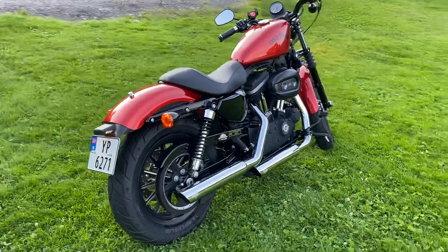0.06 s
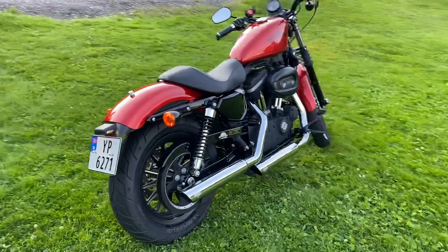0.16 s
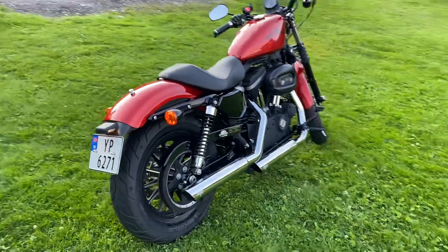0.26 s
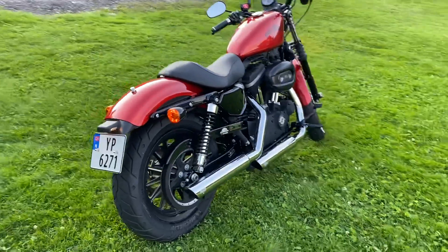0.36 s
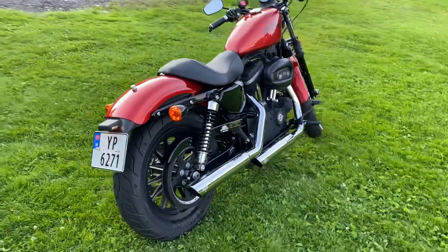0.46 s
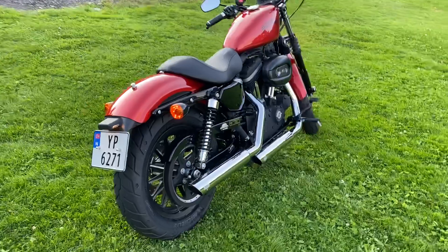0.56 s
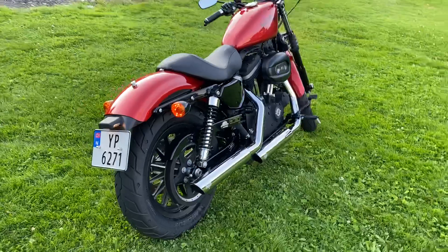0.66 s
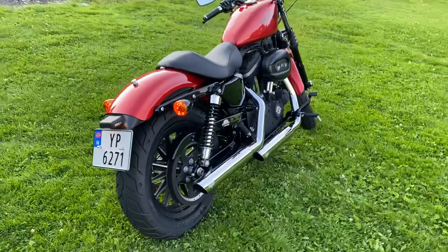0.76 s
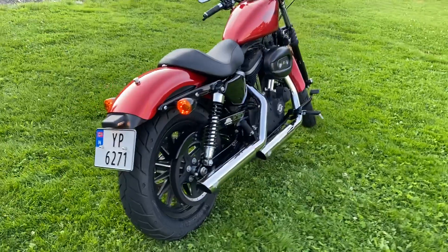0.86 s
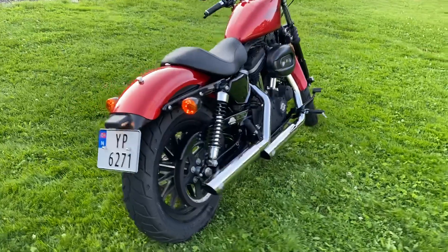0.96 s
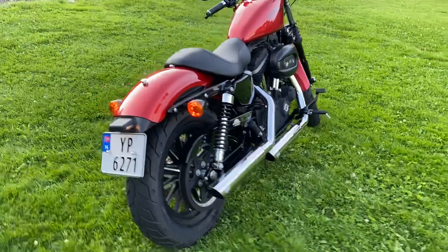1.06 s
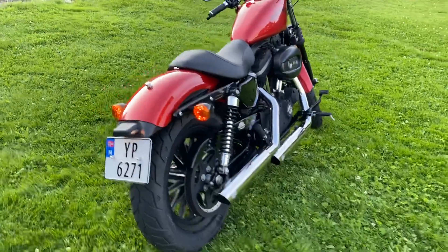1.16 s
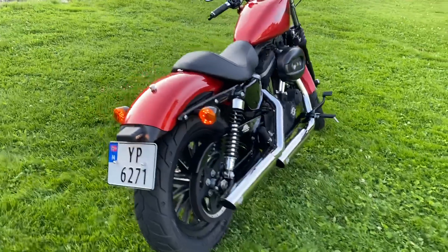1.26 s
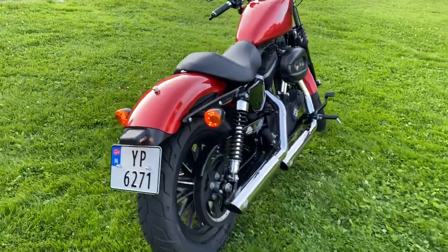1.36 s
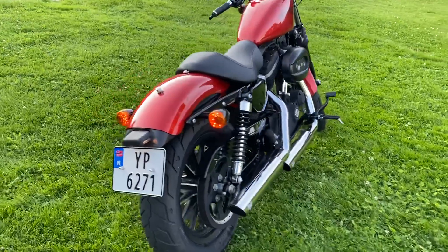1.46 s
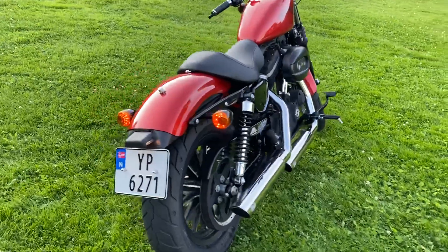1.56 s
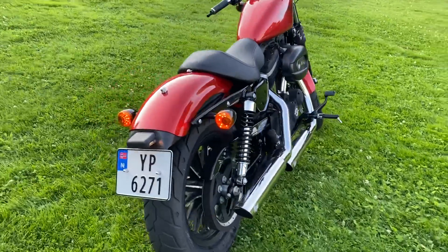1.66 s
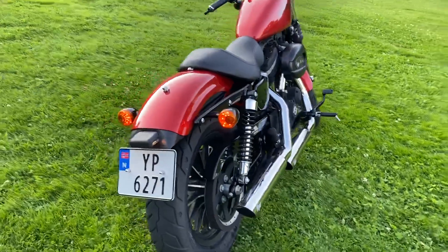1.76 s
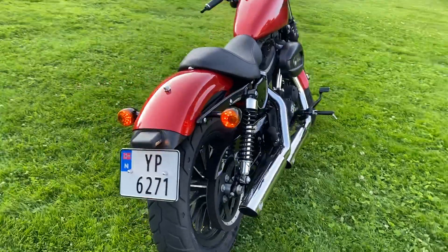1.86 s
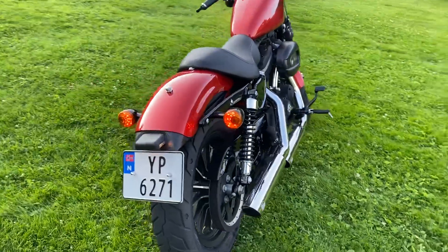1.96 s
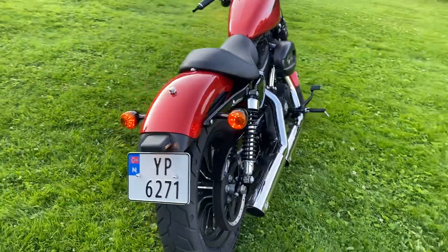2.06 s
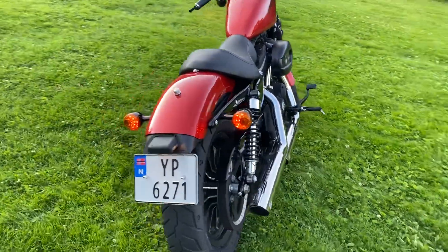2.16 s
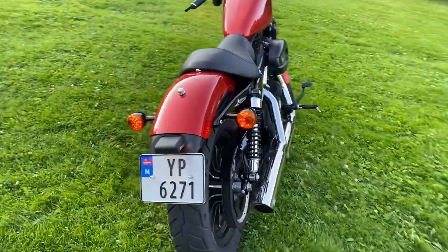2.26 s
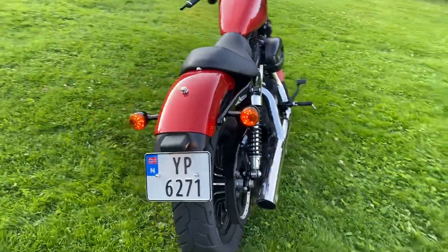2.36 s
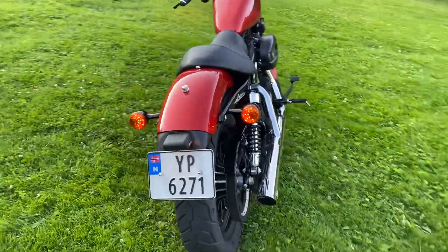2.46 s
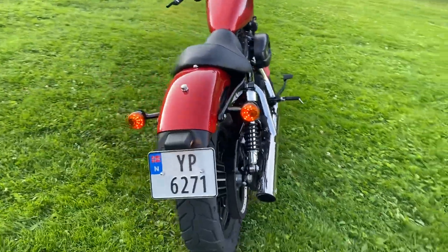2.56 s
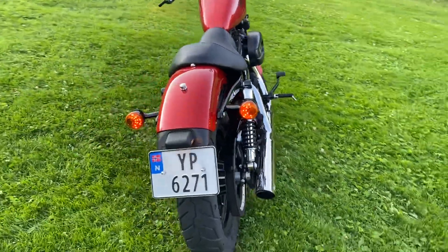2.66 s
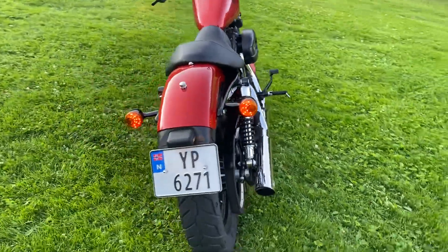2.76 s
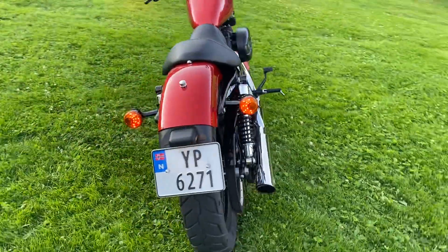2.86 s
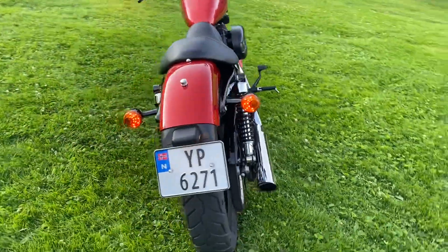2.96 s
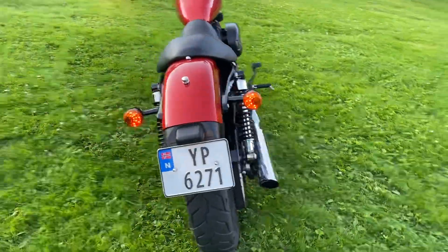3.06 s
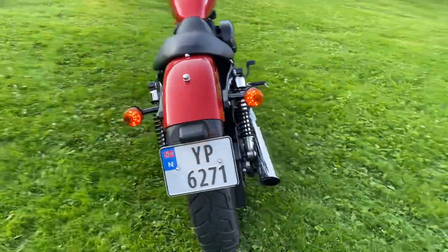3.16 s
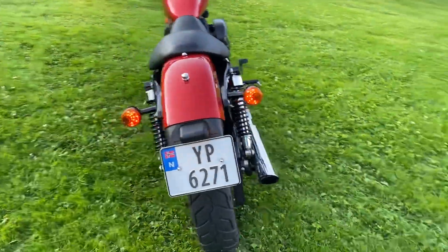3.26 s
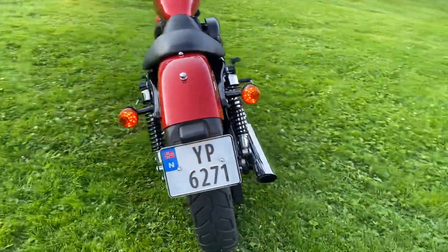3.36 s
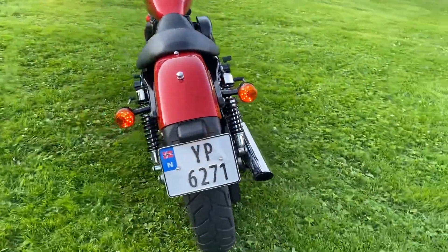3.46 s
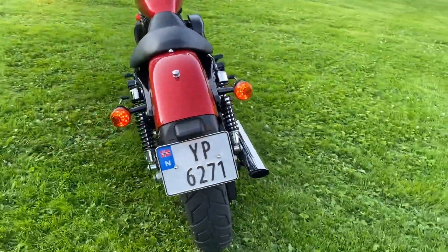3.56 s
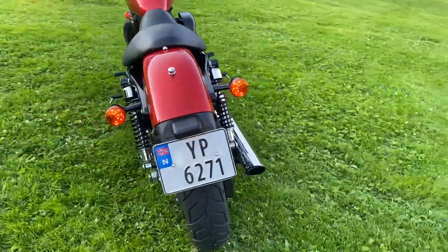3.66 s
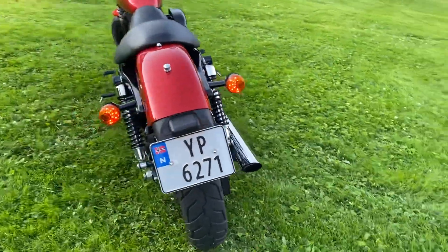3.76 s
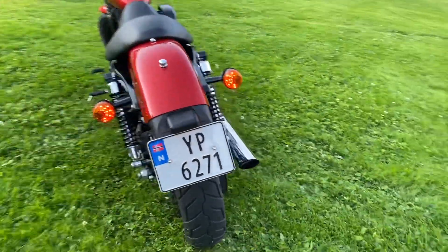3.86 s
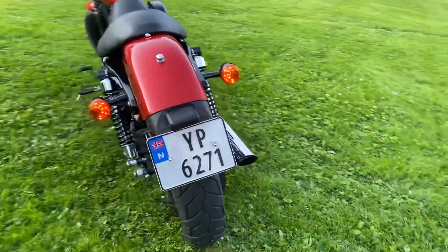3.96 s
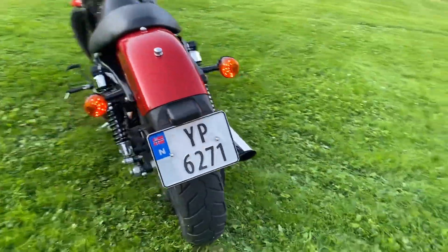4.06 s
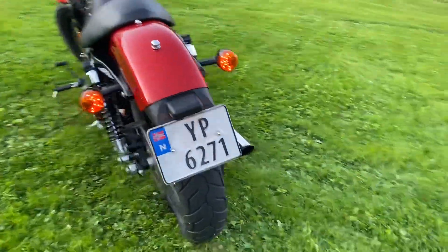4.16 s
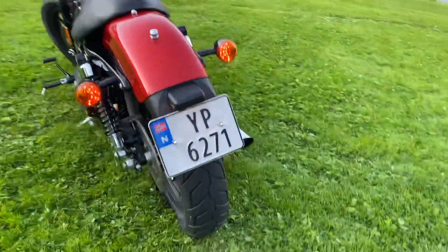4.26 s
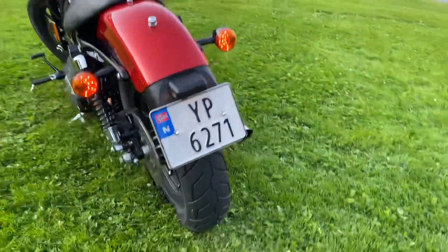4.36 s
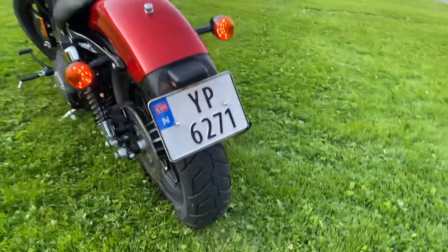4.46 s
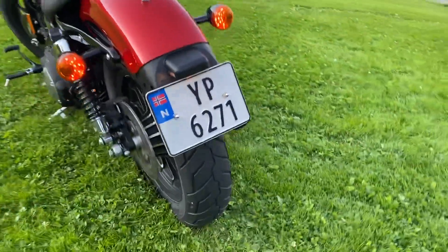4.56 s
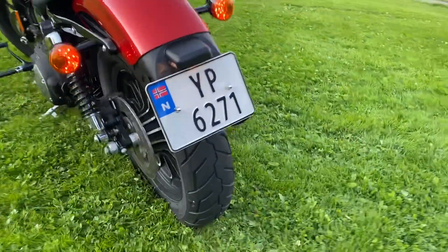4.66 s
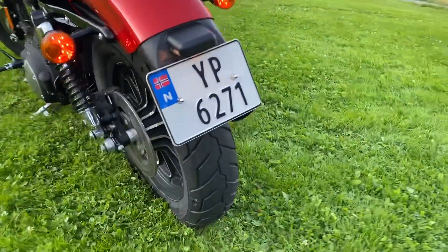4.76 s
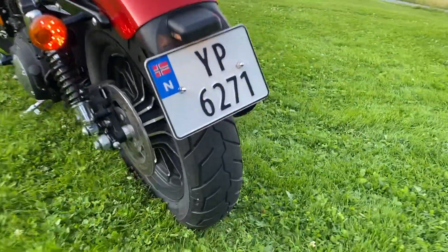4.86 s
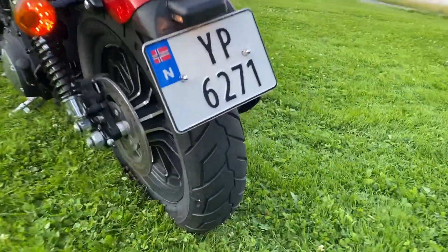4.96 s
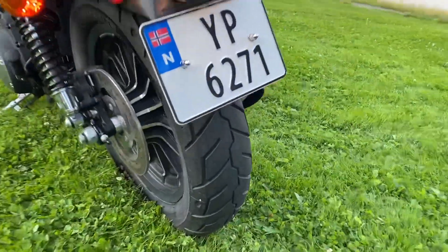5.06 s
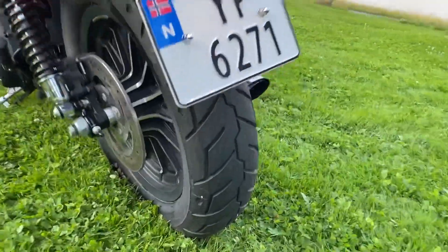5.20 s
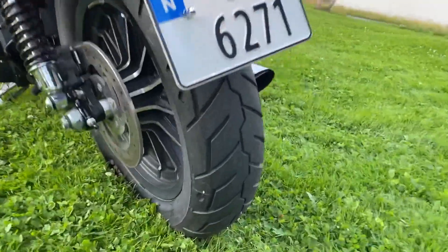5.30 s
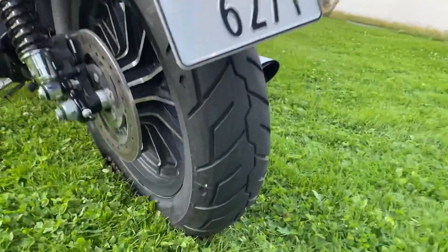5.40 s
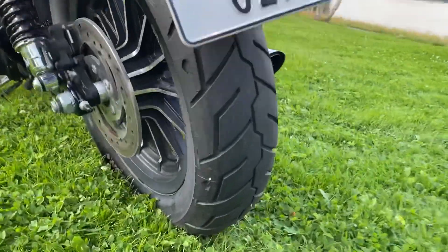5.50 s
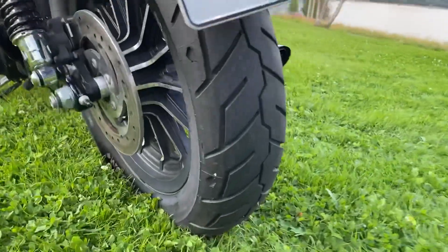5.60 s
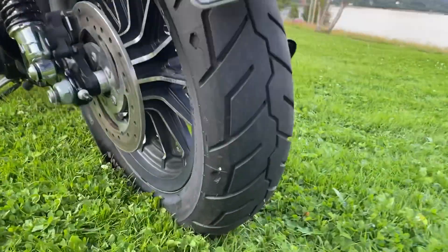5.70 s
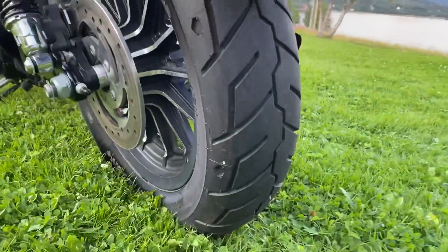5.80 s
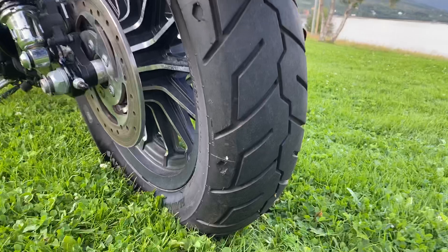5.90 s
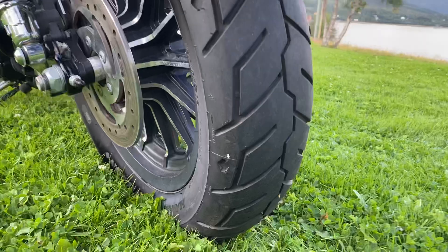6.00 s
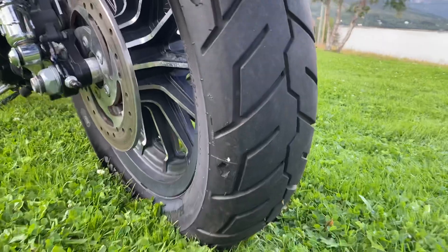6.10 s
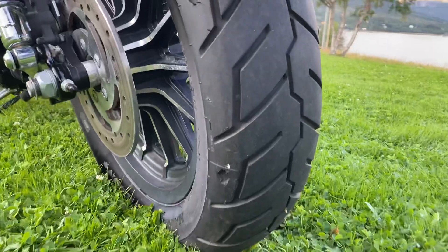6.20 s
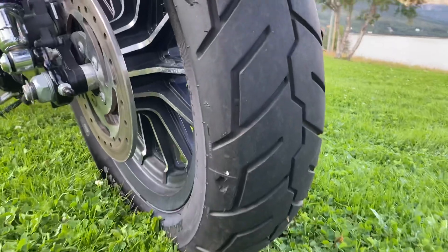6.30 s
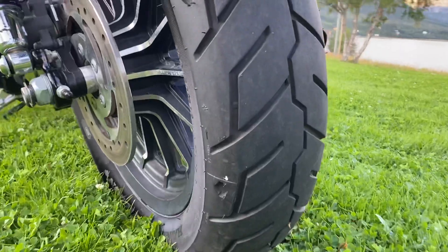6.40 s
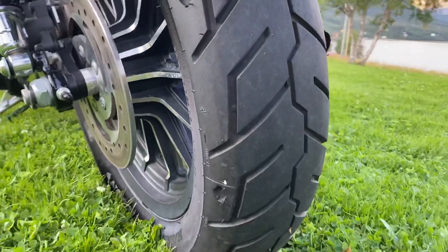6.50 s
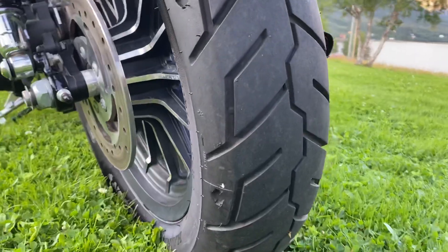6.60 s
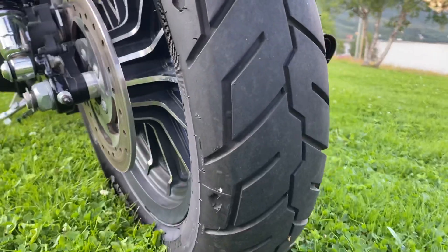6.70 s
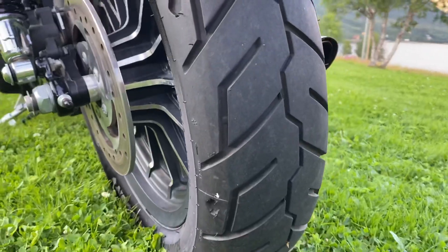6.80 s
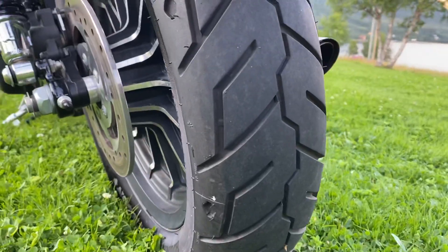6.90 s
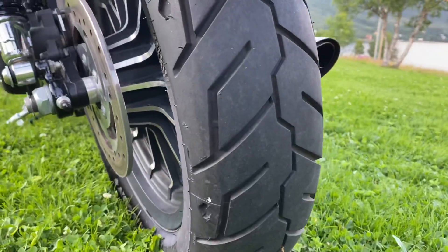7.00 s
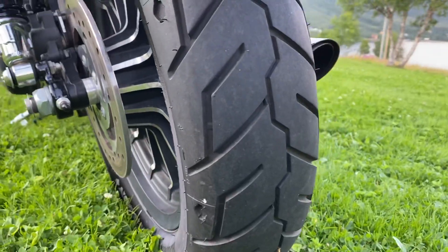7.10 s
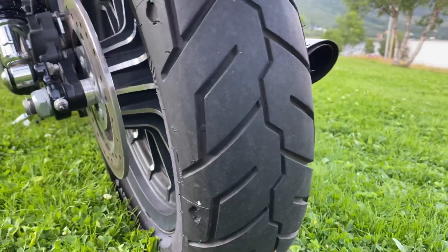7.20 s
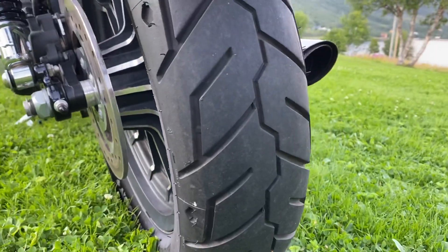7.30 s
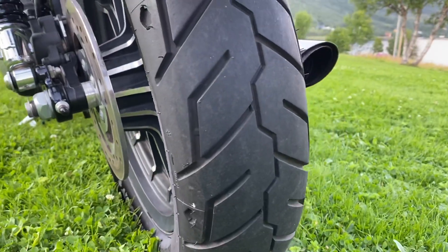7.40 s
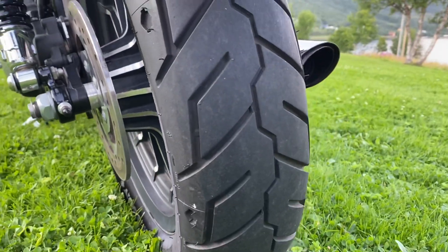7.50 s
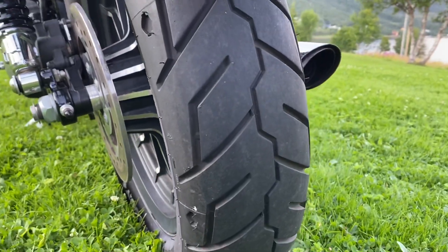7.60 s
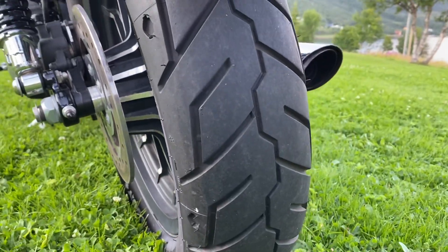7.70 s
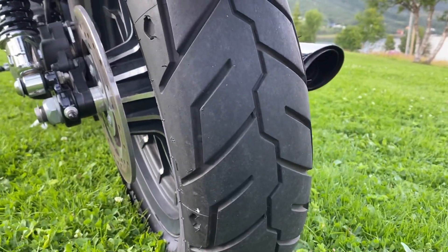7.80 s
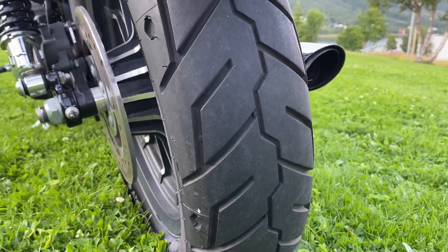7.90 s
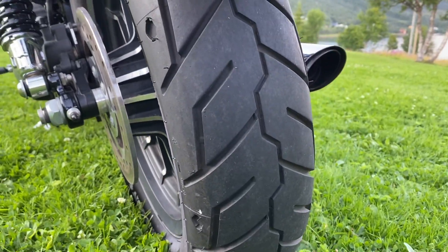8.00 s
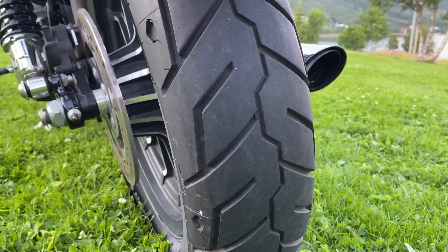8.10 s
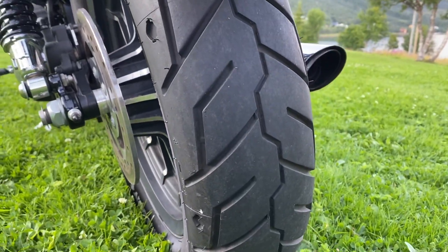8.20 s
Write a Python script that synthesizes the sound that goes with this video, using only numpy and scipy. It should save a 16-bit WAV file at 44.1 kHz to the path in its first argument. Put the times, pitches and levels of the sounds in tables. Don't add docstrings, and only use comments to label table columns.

```python
import sys
import numpy as np
from scipy import signal
from scipy.fft import rfft, irfft
from scipy.io import wavfile

SR = 44100
rng = np.random.default_rng(int(sys.argv[2]) if len(sys.argv) > 2 else 0)


def rack_gain(trim_db):
    fader = np.asarray(trim_db, float)
    return 10 ** (fader / 20)


def unload_audio(sound):
    columns = np.transpose(np.atleast_2d(sound))
    steps = np.round(np.clip(columns, -1, 1) * 32767)
    wavfile.write(sys.argv[1], SR, steps.astype(np.int16))


N = 363825
HZ = np.maximum(np.arange(N // 2 + 1) * SR / N, 1)

# time_s, cycles_done [count]; the front exhausts at each whole cycle
CRANK_TURNS = [(.0118, 0), (.2076, 2), (.4914, 5), (.689, 7), (1.4661, 15), (2.1335, 22), (2.9297, 30),
               (3.4194, 35), (3.9948, 41), (4.3906, 45), (5.0777, 52), (5.1823, 53), (5.9847, 61),
               (6.3638, 65), (6.4654, 66), (6.8488, 70), (7.7429, 79), (8.2495, 84)]
# time_s, crouch [0-1], engine_view_db, front_pipe_aim_db, rear_pipe_aim_db
LISTENER_WALK = [(0, 0.17, 1, 0.5, -4.5), (.75, 0, 1, -0.5, -3.5), (1.3, 0.15, 0.5, 1.5, -3),
                 (1.55, 0.13, 1.5, 0, 2), (2.1, 0.14, 1.5, 1, 3.5), (2.6, 0.14, -2, 0.5, 2),
                 (3.3, 0.1, -4, -1.5, -2.5), (3.45, 0.16, -4, -7, 0.5), (4.2, 0.24, -5.5, -10, 0),
                 (4.9, .4, -2.5, -12.5, -1.5), (5.5, 0.9, -1.5, -5, 4.5), (6.0, 1, 0, -4.5, 0),
                 (6.55, 0.77, -2.5, -5, 3.5), (7.1, 1, -2.5, -3, 3.5), (7.9, 0.85, -2, -1, 4.5),
                 (8.1, 0.8, -8, 0, 4.5), (8.25, 0.55, -2, -12, -5)]
# time_s, charge_db
FRONT_MIXTURE = [(.01, 1), (.11, 2.5), (.21, 0), (.3, -2), (.4, 3), (.59, -1), (.88, 0), (1.27, -2),
                 (1.37, -3.5), (1.85, -1), (1.94, 2), (2.23, -2.5), (2.43, 2), (2.83, -1.5), (2.93, 2.5),
                 (3.13, -2), (3.71, 0.5), (4.39, -1.5), (4.58, 3), (5.08, 4.5), (5.58, 3), (5.98, 1.5),
                 (6.27, -2.5), (6.56, -2), (7.05, 1), (7.54, 0.5), (7.64, -1.5), (7.84, -2), (7.94, 0.5),
                 (8.15, -1)]
# time_s, charge_db
REAR_MIXTURE = [(.53, 1.5), (4.63, 2), (.63, -10.5), (.73, -3), (1.02, -6.5), (1.22, 14), (1.51, 2),
                (1.98, 2), (2.28, 1), (2.38, -7), (2.87, -4), (2.97, -12), (3.17, 11.5), (3.26, 0),
                (3.36, -4), (4.04, 0), (4.73, -21), (4.83, -5), (5.23, 1), (5.53, -0.5), (5.83, 1.5),
                (5.93, -10), (6.21, 3), (6.41, -3), (6.51, -5.5), (6.89, 1.5), (7.69, 0), (7.79, -9.5),
                (7.89, -2), (8.19, -10)]
# level_db, aim_slope [dB/dB], crouch_gain_db
FRONT_STROKE_LAW = [(-0.27, 0, 1.76), (-17.5, 0.02, 2.5), (-20, 2, 3), (-21.5, 0.74, -1.5)]
REAR_STROKE_LAW = [(-0.2, 0, 2), (-15, 0.66, 0.5), (-15, 1, 0), (-16, 0.29, 3.5)]
MISFIRE_LAW = [(-2, 0.29, 4), (-35, 0.99, 0), (-39, 1, 3), (-37.5, 0.86, 5.5)]
# pitch_hz, level_db [per Hz]
RUMBLE_COLOUR = [(25, -20), (60, 14.5), (200, 15), (420, -3.5), (700, -0.5), (900, -10), (1200, -7.5),
                 (1400, -20), (1550, -9), (1800, -57), (2500, -51)]
# pitch_hz, level_db [per Hz]
HISS_COLOUR = [(900, -13), (1700, 0.5), (2200, 4), (2700, 0), (3300, 0.5), (4000, -3), (5000, -7),
               (6200, -3), (7000, -12), (9000, -7.5), (12000, -16.5), (15800, -17), (15950, -50)]
# turn_share [0-1 after the front stroke], level_db [drive of the swell in rumble and hiss]
VALVE_TICKS = [
    (.21, -53),
    (.33, 6.5),
    (.58, -56),
    (.72, 2),
    (.8, 1),
]
# pitch_hz, strength [signed], arrival_ms, build_ms, decay_ms
FRONT_MODES = [(75.2, 1.6, 7.6, 19, 33), (91, 5.4, .65, 15.3, 4.45), (150, -6.7, 1.75, 14.4, 4.8),
               (214, .56, 3.15, 7.2, 17), (367, 2.4, 5.5, 30, 2.7)]
REAR_MODES = [(70, -.56, -.5, 18, 300), (124, .57, 3, 1.1, 9.8), (180, -1.55, 9.45, 2.8, 5.4),
              (236, -.3, 8.5, .3, 12), (372, 1.3, 2.6, 30, 4.6)]
MISFIRE_MODES = [(74, -1.96, 9.15, 30, 20), (97, -.173, -2.1, 14.4, 300), (146, .104, 1.4, 30, 300),
                 (200, .031, 2, 1.7, 300)]
# pitch_hz, level_db [per Hz]
BARK_COLOUR = [(200, -12), (320, -1.5), (480, -1.5), (800, -3), (1150, -1.5), (1500, -11.5), (2000, -21),
               (3000, -19)]
# pitch_hz, level_db [per Hz]
CRACK_COLOUR = [(900, -2.5), (1800, -9.5), (2500, -4.5), (3300, 1.5), (4200, -5.5), (5200, -8.5),
                (6400, -12), (8500, -2.5), (11000, -7.5), (13300, -1), (15650, -8.5), (15900, -29)]
# pitch_hz, level_db, t60_s
WALL_MODES = [(429, -7.5, 0.08), (1180, -14, 0.021), (3447, -9, 0.013), (4304, 2.5, 0.012),
              (6355, -4.5, 0.018)]
# pitch_hz, left_lead_rad, left_over_right_db, shared [0-1]
MICROPHONE_PAIR = [(60, .03, -.8, 1), (150, .13, -2, 1), (300, .08, -2.2, .99), (600, .7, -2, .9),
                   (1000, 1.2, 1.5, .85), (1700, .9, 1, .6), (2400, .3, 1.5, .8), (3500, .35, -.6, .9),
                   (5500, .6, -1.5, .5), (7200, -.2, .3, .95), (8500, -2.55, 0, .995),
                   (9600, -3.9, 0, .995), (10400, -5.4, 0, .985), (11500, -6.8, 0, .985),
                   (12700, -8.72, 0, .995), (13800, -10.12, 0, .995), (15400, -12.6, 0, .99)]


def cycle_times():
    time_s, done = np.transpose(CRANK_TURNS)
    return np.interp(np.arange(done[-1]), done, time_s)


def cycle_lengths(starts_s):
    return np.append(np.diff(starts_s), .1)


def walk(time_s):
    at_s, *controls = np.transpose(LISTENER_WALK)
    return [np.interp(time_s, at_s, control) for control in controls]


def rms_one(x):
    return x / np.sqrt(np.mean(x ** 2))


def flutter(rate_hz):
    lowpass = signal.butter(2, rate_hz, fs=SR, output="sos")
    return rms_one(signal.sosfilt(lowpass, rng.standard_normal(N)))


def gas_noise(colour):
    hz, db = np.transpose(colour)
    shape = rack_gain(np.interp(np.log(HZ), np.log(hz), db))
    port_hz, _, _, port_shared = np.transpose(MICROPHONE_PAIR)
    shared = np.interp(HZ, port_hz, port_shared)
    common, left, right = rfft(rng.standard_normal((3, N)))
    mixed = np.sqrt(shared) * common + np.sqrt(1 - shared) * np.array([left, right])
    return mixed * rms_one(shape)


def puffs(times_s, level_db, rise_ms, fall_ms):
    clicks = np.zeros(N)
    clicks[np.clip(np.round(times_s * SR).astype(int), 0, N - 1)] = rack_gain(level_db)
    t_ms = np.arange(SR // 16) * 1000 / SR
    shape = (1 - np.exp(-t_ms / rise_ms)) ** 2 * np.exp(-t_ms / fall_ms)
    return signal.fftconvolve(clicks, shape / shape.max())[:N]


def bursts(colour, times_s, edges_hz, levels_db, rise_ms, fall_ms, spread_db):
    noise, out = gas_noise(colour), 0
    favour_db = spread_db * rng.standard_normal((len(times_s), len(edges_hz)))
    for k, (low, high) in enumerate(zip(edges_hz, edges_hz[1:])):
        band = irfft(noise * (HZ >= low) * (HZ < high), N)
        level_db = levels_db[k] + favour_db[:, k] * min(1, 5000 / high)
        out = out + band * puffs(times_s, level_db, rise_ms, fall_ms * (high / 3000) ** -.25)
    return out


def engine_body(rumble_db, hiss_db):
    turns_s = cycle_times()
    length_s = cycle_lengths(turns_s)
    scatter_db = 2.0 * rng.standard_normal((len(turns_s), len(VALVE_TICKS)))
    ticks = np.zeros(N)
    for k, (share, db) in enumerate(VALVE_TICKS):
        ticks = ticks + puffs(turns_s + share * length_s, db + scatter_db[:, k], 0.5, 9.0)
    rumble_gain = rack_gain(rumble_db + 1.5 * flutter(40)) * (1 + .5 * ticks)
    hiss_gain = rack_gain(hiss_db + 2.0 + 2.9 * flutter(33)) * (1 + 0.063 * ticks)
    rumble = irfft(gas_noise(RUMBLE_COLOUR), N) * rumble_gain
    hiss = irfft(gas_noise(HISS_COLOUR), N) * hiss_gain
    return rumble + hiss


def charges(mixture, stroke_s):
    out = np.zeros(len(stroke_s))
    for time_s, db in mixture:
        out[np.argmin(abs(stroke_s - time_s))] = db
    return out


def stroke_rows(time_s, law, aim_db, crouch, charge_db):
    jitter_ms, scatter_db = .3, (.5, 1.8, 1.7, 1.2)
    chance = rng.standard_normal((len(time_s), 5))
    base_db, per_aim, crouch_db = np.transpose(law)
    rich_db = np.outer(charge_db, [.15, 1, 1, 1])
    db = base_db + np.outer(aim_db, per_aim) + np.outer(crouch, crouch_db) + rich_db
    db = db + chance[:, 1:] * scatter_db
    return np.column_stack([time_s + chance[:, 0] * jitter_ms / 1000, db])


def firing():
    rear_lag = .4284
    slip_cycle, extra_cycles = 66, [10, 30, 79]
    front_s = cycle_times()
    rear_s = front_s + rear_lag * cycle_lengths(front_s)
    cycle = np.arange(len(front_s))
    fires = ((cycle + (cycle >= slip_cycle)) % 2 == 1) | np.isin(cycle, extra_cycles)
    crouch, _, front_db, rear_db = walk(front_s)
    rear_charge_db = charges(REAR_MIXTURE, rear_s)
    front = stroke_rows(front_s, FRONT_STROKE_LAW, front_db, crouch, charges(FRONT_MIXTURE, front_s))
    rear = stroke_rows(rear_s, REAR_STROKE_LAW, rear_db, crouch, rear_charge_db)[fires]
    miss = stroke_rows(rear_s, MISFIRE_LAW, rear_db, crouch, rear_charge_db)[~fires]
    return front, rear, miss


def thumps(strokes, modes, shut_ms, fade_ms, lift_db):
    out, lead = np.zeros(N + SR), 250
    chance = rng.standard_normal((len(strokes), 1 + len(modes)))
    t_ms = np.arange(-lead, 2800) * 1000 / SR
    valve_open = 1 / (1 + np.exp((t_ms - shut_ms) / fade_ms))
    for (time_s, thump_db, *_), (heat, *uneven) in zip(strokes, chance):
        wave, at = 0, round(time_s * SR)
        for (hz, strength, arrival, build, decay), odd in zip(modes, uneven):
            u = np.maximum(t_ms - arrival, 0)
            gain = strength * rack_gain(.5 * odd + lift_db[at] * (hz > 190))
            envelope = (1 - np.exp(-u / build)) * np.exp(-u / decay)
            wave = wave + gain * envelope * np.sin(2 * np.pi * hz * (1 + .005 * heat) * u / 1000)
        out[at:at + len(t_ms)] += rack_gain(thump_db) * wave * valve_open
    return out[lead:lead + N]


def barks(strokes):
    time_s, bark_db = strokes[:, 0], strokes[:, 2]
    return bursts(BARK_COLOUR, time_s - .002, [1, 600, 1000, 4000], [bark_db - 5.0] * 3, 2.7, 8.7, 0.24)


def cracks(strokes):
    time_s, core_db, edge_db = strokes[:, 0], strokes[:, 3] - 2.5, strokes[:, 4] - 1.5
    edges_hz = [1, 2500, 3100, 3800, 5000, 7000, 10000, 17500]
    levels_db = [core_db] * 4 + [edge_db] * 3
    jet = bursts(CRACK_COLOUR, time_s + 0.00021, edges_hz, levels_db, 1.8, 5.0, 3.2)
    wake = bursts(CRACK_COLOUR, time_s + 0.0045, [2300, 4900], [core_db - 20.5], 5.1, 15.3, 2.8)
    return (jet + wake) * rack_gain(2.32 * flutter(248))


def tailpipe(strokes):
    out, t = np.zeros(N + SR), np.arange(3000) / SR
    chance = rng.standard_normal((len(strokes), len(WALL_MODES), 3))
    hz, mode_db, t60_s = np.transpose(WALL_MODES)
    for (time_s, _, bark_db, core_db, _), (odd, shift, late) in zip(strokes, chance.transpose(0, 2, 1)):
        level = rack_gain(np.where(hz < 2000, bark_db, core_db) + mode_db + 2.5 * odd)
        u = np.maximum(t[:, None] - .004 - 0.00115 * late, 0)
        envelope = (1 - np.exp(-u / .001)) * rack_gain(-60 * u / t60_s)
        rings = envelope * np.sin(2 * np.pi * hz * (1 + .05 * shift) * u)
        out[round(time_s * SR):][:len(t)] += rings @ level
    return out[:N]


def valve_knock(rumble_db):
    turn_share, pitch_hz, t60_s, level_db = .72, 659, 0.0539, -5
    turns_s = cycle_times()
    at = ((turns_s + turn_share * cycle_lengths(turns_s) - .004) * SR).astype(int)
    knock_db = rumble_db[at] + level_db + 3.0 * rng.standard_normal(len(at))
    clicks = np.full(N, 1e-18)
    clicks[at] = rack_gain(knock_db) * rng.choice([-1, 1], len(at))
    radius, angle = rack_gain(-60 / (t60_s * SR)), 2 * np.pi * pitch_hz / SR
    resonator = [1, -2 * radius * np.cos(angle), radius * radius]
    return signal.lfilter([0, np.sin(angle)], resonator, clicks)


def ground_echo(x, dip_db):
    dip_hz, width_hz = 344.5, 63
    band = irfft(rfft(x) * np.exp(-.5 * ((HZ - dip_hz) / width_hz) ** 2), N)
    return x + band * (rack_gain(dip_db) - 1)


def scene():
    crouch, view_db, _, _ = walk(np.arange(N) / SR)
    lift_db = 2.5 * crouch
    dip_db = -9 + 12.5 * crouch
    rumble_db = -27 + 0.39 * view_db + 3.0 * crouch
    body = engine_body(rumble_db, -44 + view_db)
    fronts, rears, misses = firing()
    front = rack_gain(-0.1) * thumps(fronts, FRONT_MODES, 41, 1.3, lift_db)
    rear = rack_gain(0.9) * thumps(rears, REAR_MODES, 40.3, 1, lift_db)
    miss = rack_gain(3.0) * thumps(misses, MISFIRE_MODES, 55, 1.2, lift_db)
    strokes = np.vstack([fronts, rears, misses])
    exhaust = front + rear + miss + barks(strokes) + cracks(strokes) + tailpipe(strokes)
    return ground_echo(exhaust + body + valve_knock(rumble_db - dip_db / 2), dip_db)


def roll_off(x):
    return signal.sosfilt(signal.butter(12, 16980, fs=SR, output="sos"), x)


def record(dry):
    low_cut_hz, high_cut_hz, ceiling, offset = 37, 16800, .86, -.009
    hz, lead_rad, balance_db, _ = np.transpose(MICROPHONE_PAIR)
    half = np.exp(.5j * np.interp(HZ, hz, lead_rad)) * rack_gain(np.interp(HZ, hz, balance_db) / 2)
    low_cut = 1 / np.sqrt(1 + (low_cut_hz / HZ) ** 6)
    x = irfft(rfft(dry) * low_cut * np.array([half, 1 / half]), N)
    x = x / (1 + (x / ceiling) ** 6) ** (1 / 6) + offset
    mix = signal.sosfilt(signal.cheby2(20, 60, high_cut_hz, fs=SR, output="sos"), x)
    return roll_off(mix)


dry = scene()
out = record(dry)
unload_audio(out)
```